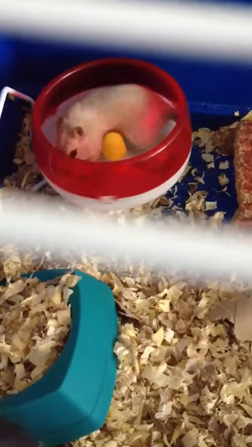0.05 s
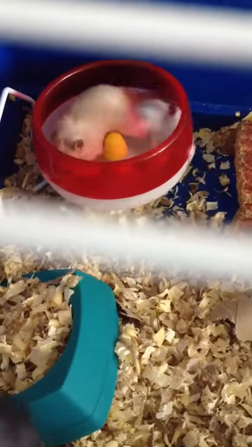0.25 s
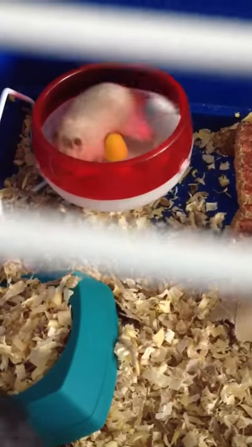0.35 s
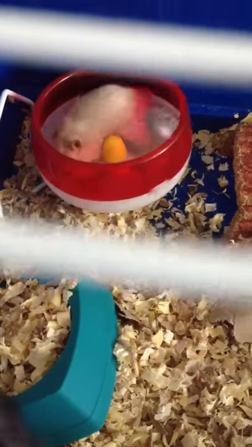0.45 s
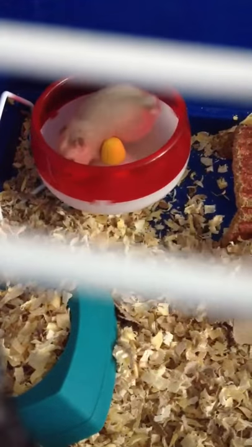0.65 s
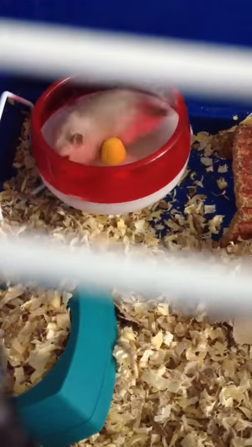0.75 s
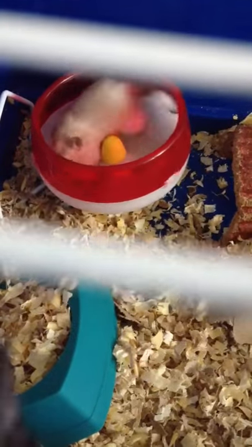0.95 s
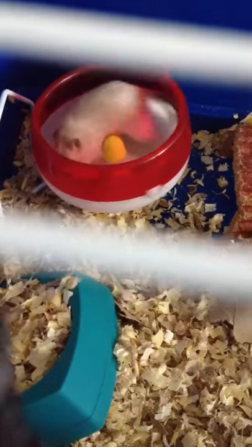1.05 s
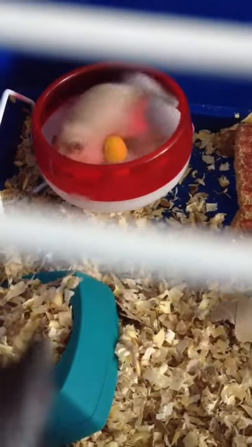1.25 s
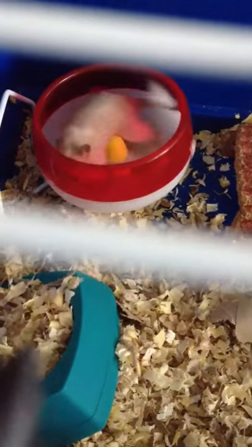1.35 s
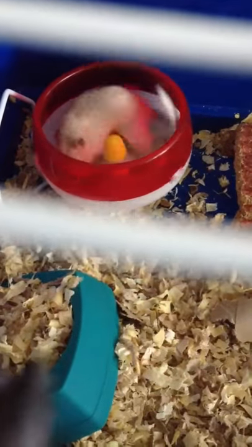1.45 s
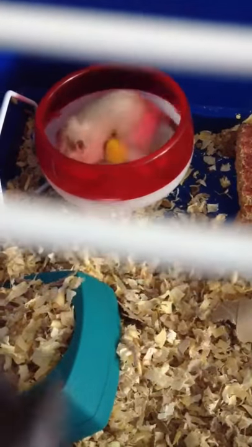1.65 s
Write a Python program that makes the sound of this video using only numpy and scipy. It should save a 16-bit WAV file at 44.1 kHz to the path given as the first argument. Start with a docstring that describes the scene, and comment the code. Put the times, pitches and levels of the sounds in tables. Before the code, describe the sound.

A small rodent runs in a plastic wheel close by, its claws ticking and scratching lightly and unevenly throughout, with soft thumps from the wheel. A hard hollow knock comes at 0.3 seconds and the sharpest claw tick at 0.7. Two dull, padded knocks follow at 0.8 and 1.0, then a brighter hard knock at about 1.4. The knocks echo briefly in a small room over quiet, steady room noise.

```python
"""A small rodent runs in a plastic wheel in a cage, close to the microphone.
Its claws tick and scratch on the plastic, making it ring brightly, and its weight thumps the wheel softly.
Four blows on something hollow, two hard and two padded, ring out into a small room.
Quiet room noise lies under it all."""
import sys
import numpy as np
from scipy import signal
from scipy.fft import rfft, irfft
from scipy.io import wavfile
from scipy.ndimage import uniform_filter1d

SR = 44100
rng = np.random.default_rng(int(sys.argv[2]) if len(sys.argv) > 2 else 0)


def persist_wave(psi):
    """Save psi, clipped to +-1, as 16-bit WAV."""
    counts = np.round(np.clip(psi, -1, 1) * 32767).astype(np.int16)
    wavfile.write(sys.argv[1], SR, np.atleast_2d(counts).T)


N = 74970

# The pitches at which the plastic wheel rings under a claw: pitch_hz, width_hz, level_db
PLASTIC_RINGS = [(3900, 660, 2.5), (6590, 590, -3), (7430, 230, -10.5), (8040, 1780, 1), (11040, 460, 4),
                 (11590, 700, -0.5), (13480, 980, -1.5), (15460, 330, -3.5)]


def gain(db):
    """Turn decibels into a number to multiply a sound by."""
    return 10 ** (np.asarray(db) / 20)


def normalize(x):
    """Scale a sound so that its average strength (rms) is 1."""
    return x / np.sqrt(np.mean(x ** 2))


def value_at_pitch(hz, points):
    """Read between (pitch_hz, value) points, giving every octave the same space."""
    pitches, values = np.array(points).T
    return np.interp(np.log(np.maximum(hz, 1)), np.log(pitches), values)


def shaped_noise(colour):
    """Noise of strength 1 whose balance of low and high follows (pitch_hz, level_db) points."""
    hz = np.arange(N // 2 + 1) * SR / N
    spectrum = rfft(rng.standard_normal(N)) * gain(value_at_pitch(hz, colour))
    return normalize(irfft(spectrum, N))


def keep_band(x, low_hz, high_hz, order=3):
    """Keep the part of a sound that lies between two pitches."""
    edges_hz = [low_hz, min(high_hz, 0.49 * SR)]
    return signal.sosfilt(signal.butter(order, edges_hz, "band", fs=SR, output="sos"), x)


def add_at(out, start_s, x):
    """Mix a sound in at the given time."""
    i = max(int(start_s * SR), 0)
    out[i:i + len(x)] += x[:N - i]


def room_noise():
    """The quiet, steady rush of the room, strongest in the bass."""
    # Tone of the room noise: pitch_hz, level_db
    colour = [(25, 11.5), (60, -3.5), (90, -3), (125, 9.5), (170, -3.5), (210, -0.5), (280, 1),
              (400, -12.5), (620, -5.5), (1000, -9.5), (1600, -14), (3000, -17), (8000, -22), (16000, -51)]
    return gain(-57.5) * shaped_noise(colour)


def ring_plastic(force, first_hz, second_hz, widen=1):
    """A push makes the wheel ring briefly; its two lowest pitches depend on the spot that is hit."""
    rings = [(first_hz, *PLASTIC_RINGS[0][1:]), (second_hz, *PLASTIC_RINGS[1][1:]), *PLASTIC_RINGS[2:]]
    out = np.zeros(len(force))
    for k, (pitch_hz, width_hz, level_db) in enumerate(rings):
        peak = signal.iirpeak(pitch_hz, pitch_hz / (width_hz * widen), fs=SR)
        out += (-1) ** k * gain(level_db) * signal.lfilter(*peak, force)  # neighbours swing opposite ways
    return out


def scratching():
    """Claws and bedding crumbs touch the wheel in tiny flurries that come and go with the strides."""
    # How loud the scratching is over time: time_s, level_db
    flurries = [(0, -57), (.13, -61.5), (.19, -69.5), (.31, -60.5), (0.338, -47.5), (.385, -62.5),
                (.47, -67), (.6, -59.5), (.72, -56.5), (.81, -54), (.92, -64), (1.06, -58), (1.17, -53.5),
                (1.255, -66.5), (1.321, -54), (1.48, -59), (1.538, -49), (1.592, -62), (1.7, -60)]
    touches_per_s, spread_db, flutter_db, flutter_s = 3500, 2, 2, 0.012
    sizes = gain(spread_db * np.minimum(rng.exponential(size=N), 5))
    touches = (rng.random(N) < touches_per_s / SR) * sizes * rng.standard_normal(N)
    ring = ring_plastic(touches, PLASTIC_RINGS[0][0], PLASTIC_RINGS[1][0], widen=1.26)
    treble = keep_band(ring, 3460, 0.49 * SR)
    flutter = normalize(uniform_filter1d(rng.standard_normal(N), int(flutter_s * SR)))
    level_db = np.interp(np.arange(N) / SR, *np.array(flurries).T)
    return normalize(treble) * gain(level_db + flutter_db * flutter)


def wheel_thumps():
    """The animal's weight makes the wheel boom and rub on its stand."""
    # Soft thumps of the wheel: start_s, fade_s, boom_db, rub_db
    thumps = [(.02, 0.083, -54.5, -63.5), (0.499, 0.14, -61.5, -59.5), (0.617, 0.14, -62, -57.5),
              (0.797, 0.012, -41, -48.5), (0.991, 0.0043, -33, -48.5), (1.066, 0.078, -64, -52),
              (1.16, 0.21, -58.5, -85), (1.241, 0.036, -57.5, -50.5), (1.3, 0.14, -71, -56),
              (1.52, 0.15, -94, -59)]
    # Tone of the low boom: pitch_hz, level_db
    boom_colour = [(60, -46), (100, -41), (130, 4), (165, -8.5), (210, -13.5), (280, -21), (500, -15.5),
                   (1000, -23.5), (4000, -77)]
    # Tone of the brighter rub: pitch_hz, level_db
    rub_colour = [(100, -2), (300, -13), (520, 4.5), (1000, 0), (1400, -4), (2100, -3.5), (3000, -11.5),
                  (8000, -25)]
    rise_s = 0.0043
    out, t = np.zeros(N), np.arange(N) / SR
    for start_s, fade_s, boom_db, rub_db in thumps:
        swell = (1 - np.exp(-t / rise_s)) * np.exp(-t / fade_s)
        boom = gain(boom_db) * shaped_noise(boom_colour)
        rub = gain(rub_db) * shaped_noise(rub_colour)
        add_at(out, start_s, swell * (boom + rub))
    return out


def claw_ticks():
    """Each claw scrapes for an instant, snaps onto the plastic and chatters briefly."""
    # Claw hits: time_s, level_db, low_band_db, high_band_db, first_pitch_hz, second_pitch_hz
    # (the low and high bands are set against the middle band)
    hits = [(0.028, -48.0, -6, 1, 4170, 7800), (0.0493, -51.0, -0.5, 6.0, 4000, 8170),
            (0.123, -48.0, -7, 3, 4280, 6760), (0.1372, -50, -4.5, -0.5, 4000, 7400),
            (0.2165, -43.0, -10, 6, 4030, 6800), (0.2397, -46, -13, -1.5, 4020, 8500),
            (0.2567, -49.5, -11, 4, 4120, 8320), (0.329, -48, -2, 4, 3740, 6410),
            (0.3408, -54, -8, 5.0, 4020, 6560), (0.358, -48, -6, 5, 3700, 5760),
            (0.4119, -45.0, -1.5, -1, 3900, 6420), (0.4382, -50.5, -3, -2, 4140, 7700),
            (0.4531, -50, -10, 2, 4400, 7720), (0.5817, -47, -10, -1, 3800, 6700),
            (0.6236, -39.5, -11, 4, 4120, 8230), (0.641, -35, -6.5, -1, 3550, 5700),
            (0.6492, -41, -4, 7.5, 3770, 7800), (0.7006, -27.5, 4.5, 10.5, 3850, 7500),
            (0.7844, -45, -6, -2, 3870, 6300), (0.7885, -38.5, -5.5, 3.5, 3900, 7500),
            (0.802, -48, -9, 0, 4400, 8850), (0.8234, -51, -9, 9.5, 4140, 7550),
            (0.8905, -51.5, -2.5, 3.5, 4050, 8100), (0.9646, -35.5, -3, -3, 4180, 6460),
            (0.976, -46.5, 5, 5, 4040, 8420), (0.9876, -35.5, 0, -1.5, 4160, 7400),
            (1.01, -53, -1, 12.5, 4110, 8070), (1.0133, -46.5, -4, -1, 4170, 6730),
            (1.0368, -45.5, 0, 6.5, 4040, 8500), (1.052, -44, -15, 1, 4530, 6660),
            (1.056, -42, 1, 2, 4000, 7700), (1.0609, -35, -4, 7, 3980, 8600),
            (1.124, -47, -14, 1.5, 4250, 5870), (1.1399, -43, 3.5, 8, 4120, 8800),
            (1.1466, -49, -8.0, 3, 4160, 8040), (1.1556, -47, 5, 13, 4360, 7820),
            (1.1612, -44.5, -6.0, -3.5, 4500, 7700), (1.1801, -40, -5, 2.5, 4200, 7800),
            (1.2892, -49, -18, 2, 4540, 5830), (1.2933, -45.5, -15, 10, 4360, 7050),
            (1.4056, -45, -11.5, 2, 4210, 8230), (1.4375, -43, -15.5, 0.5, 4130, 7800),
            (1.4434, -47.0, -2, 2, 4200, 7400), (1.5527, -52, -5, -1, 4400, 5900),
            (1.6161, -50.5, -9, 4, 4400, 8650), (1.6612, -51.0, -5.5, 1, 4040, 6700)]
    # The middle and high bands of a tick: low_hz, high_hz
    upper_bands = [(5100, 9500), (9500, 16000)]
    scrape_db, scrape_s, snap_force, chatter_s = -11.5, 0.0018, 4.6, 0.0021
    snap_index = 176
    out, t = np.zeros(N), (np.arange(1024) - snap_index) / SR
    scrape = gain(scrape_db) * np.exp(-abs(t) / scrape_s)
    shape = np.where(t < 0, scrape, np.exp(-abs(t) / chatter_s))
    scale = np.sqrt(220 / len(t)) * gain(0.15)  # a tick's level counts its energy as packed into 5 ms
    for time_s, level_db, low_db, high_db, first_hz, second_hz in hits:
        force = shape * rng.standard_normal(len(t))
        force[snap_index] += snap_force
        ring = ring_plastic(force, first_hz, second_hz)
        bands = [(0.93 * first_hz, 1.29 * first_hz), *upper_bands]
        parts = [normalize(keep_band(ring, *edges_hz, order=2)) for edges_hz in bands]
        tick = sum(gain(db) * part for db, part in zip([low_db, 0, high_db], parts))
        add_at(out, time_s - snap_index / SR, scale * gain(level_db) * normalize(tick))
    return out


def fade_in_room(x):
    """Let each octave of a noise die away as it does in the room, where the bass lasts longest."""
    # How long the room's echo takes to drop by 60 dB: pitch_hz, ring_s
    ring_times = [(150, 0.54), (600, 0.52), (1800, 0.26), (5000, 0.24), (14000, 0.25)]
    t, hz = np.arange(N) / SR, np.arange(N // 2 + 1) * SR / N
    octaves_hz = 62.5 * 2.0 ** np.arange(9)
    out, spectrum = np.zeros(N), rfft(x)
    for centre_hz, this_octave in zip(octaves_hz, np.eye(len(octaves_hz))):
        share = np.interp(np.log(hz + 1), np.log(octaves_hz), this_octave)
        fade = gain(-60 * t / value_at_pitch(centre_hz, ring_times))
        out += irfft(spectrum * share, N) * fade
    return out


def claw_echo(ticks):
    """The room sends back a faint, duller wash of the ticks."""
    wash = keep_band(rng.standard_normal(N), 330, 13200, order=1)
    echo_of_a_click = normalize(fade_in_room(wash)) / np.sqrt(N)
    return gain(-14) * signal.fftconvolve(ticks, echo_of_a_click)[:N]


def hollow_knocks():
    """A blow slaps, cracks and rings a hollow body, low notes building up last; the room echoes it."""
    # Blows, hard (bright) or padded (dull): start_s, level_db, treble_limit_hz, place (0 left, 1 right)
    blows = [(0.286, -26, 3520, 0.44), (0.777, -38, 630, 0.9), (0.993, -35, 185, 0.1),
             (1.358, -25, 5800, 0.98)]
    # The body's notes when hit on either side: pitch_hz, left_db, right_db, ring_s (to drop by 60 dB)
    body_notes = [(136, -2.5, -3.5, 0.26), (169.3, -0.5, -4, 0.49), (283.5, -1.5, -5.5, 0.3),
                  (379, -17.5, -5, 0.24), (519, 5, -1, 0.17), (642, -18, -20, 0.93), (859, -3, -4.5, 0.12),
                  (953, -6.5, -0.5, 0.11), (1020, -8, 0, 0.12), (1107, 10, 6, 0.03), (1446, -6, 2, 0.048),
                  (2003, -4.5, -0.5, 0.046), (2583, 2, 5.5, 0.011), (3330, -14, 3.5, 0.014)]
    # Tone of the knocks' echo: pitch_hz, level_db
    echo_colour = [(60, -46), (105, -6), (140, 2.5), (280, 0.5), (370, -5), (600, 1.5), (950, -5.5),
                   (1400, -8.5), (2700, -7.5), (4000, -20), (16000, -14)]
    slap_s, crack_s, build_cycles = 0.00014, 0.0043, 0.88
    early_s, echo_rise_s = 0.0063, 0.0023
    out, t = np.zeros(N), np.arange(N) / SR
    slap_time = t / slap_s - np.pi
    slap = gain(-9) * slap_time * np.exp((1 - slap_time ** 2) / 2)  # one quick swing of air pressure
    early_boost = 1 + gain(0.5) * np.exp(-t / early_s)  # the first bounces off the walls
    echo_shape = early_boost * (1 - np.exp(-t / echo_rise_s))
    for start_s, level_db, treble_limit_hz, place in blows:
        ring = np.zeros(N)
        for k, (pitch_hz, left_db, right_db, ring_s) in enumerate(body_notes):
            strength = (-1) ** k * gain(np.interp(place, [0, 1], [left_db, right_db]))
            build_up = 1 - np.exp(-t * pitch_hz / build_cycles)
            ring += strength * np.cos(2 * np.pi * pitch_hz * t) * build_up * gain(-60 * t / ring_s)
        crack = gain(-4) * keep_band(rng.standard_normal(N), 810, 6300, order=2) * np.exp(-t / crack_s)
        echo = gain(-11.5) * fade_in_room(shaped_noise(echo_colour)) * echo_shape
        knock = slap + ring / np.sqrt(len(body_notes)) + crack + echo
        softened = signal.lfilter(*signal.butter(2, treble_limit_hz, fs=SR), knock)
        add_at(out, start_s, gain(level_db) * softened)
    return out


def scene():
    """Mix the running rodent, the knocks and the room noise into one channel."""
    ticks = claw_ticks()
    rodent = ticks + claw_echo(ticks) + scratching() + wheel_thumps()
    return (rodent + hollow_knocks() + room_noise())[None]


def record(dry):
    """The recorder thins the deep bass and cuts the highest treble."""
    bass_cut_hz, treble_cut_hz = 139, 15450
    thinned = signal.sosfilt(signal.butter(2, bass_cut_hz, "high", fs=SR, output="sos"), dry)
    return signal.sosfilt(signal.ellip(8, 0.2, 70, treble_cut_hz, fs=SR, output="sos"), thinned)


dry = scene()
out = record(dry)
persist_wave(out)
```